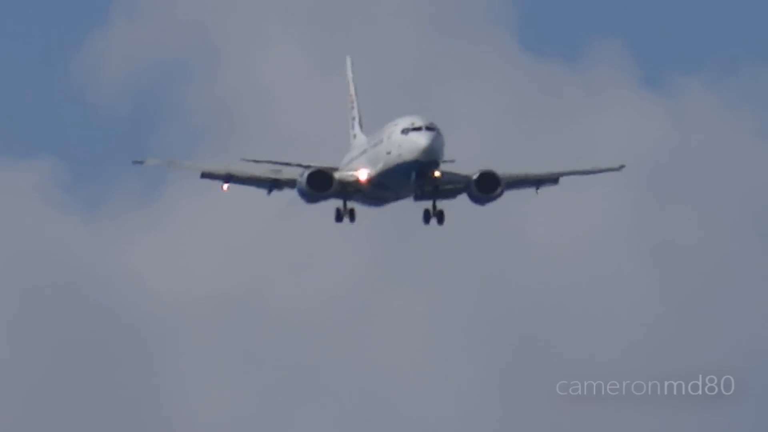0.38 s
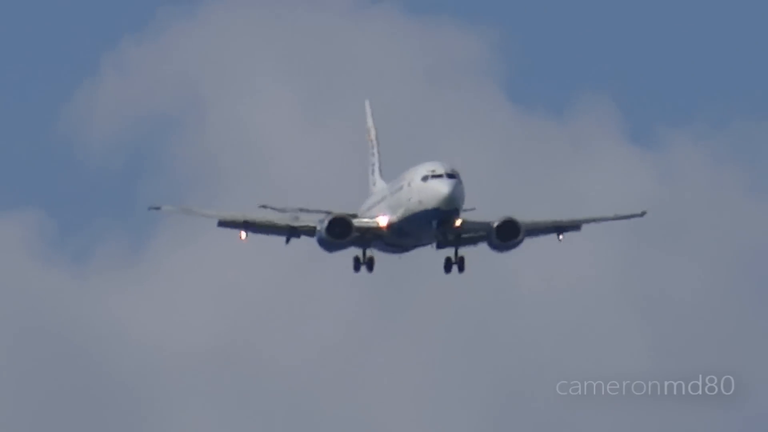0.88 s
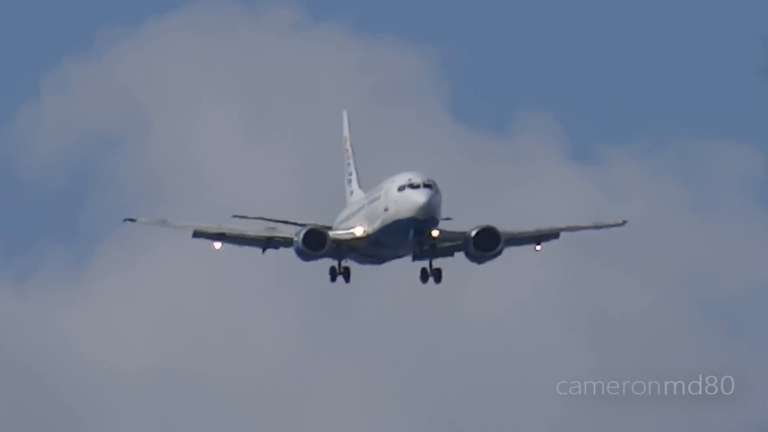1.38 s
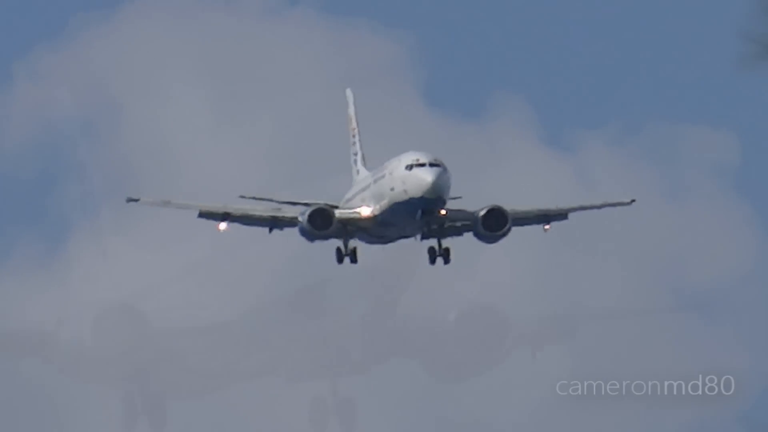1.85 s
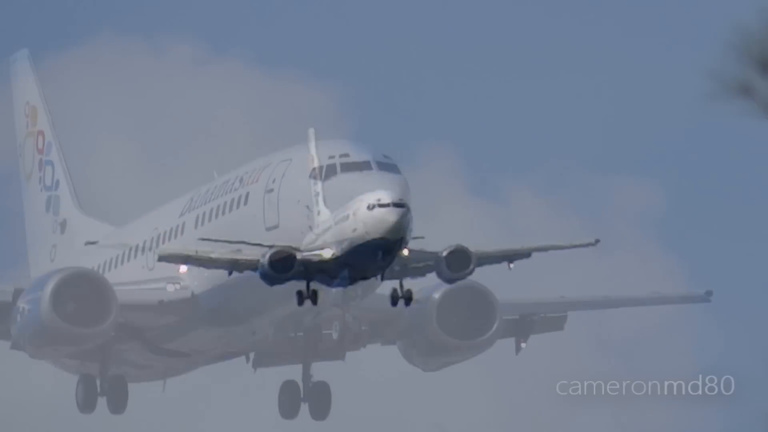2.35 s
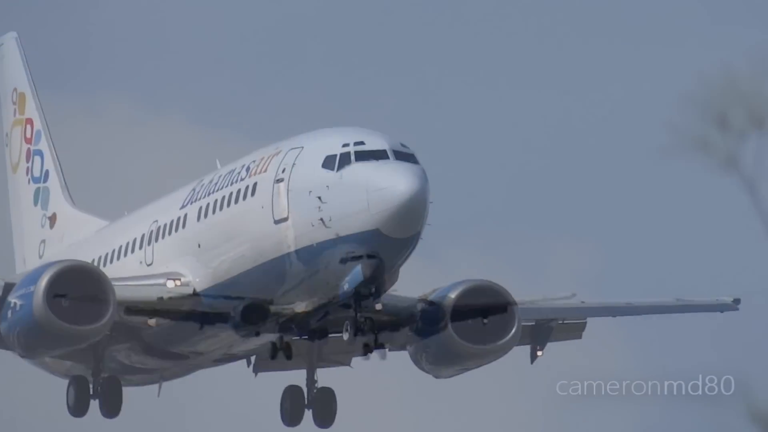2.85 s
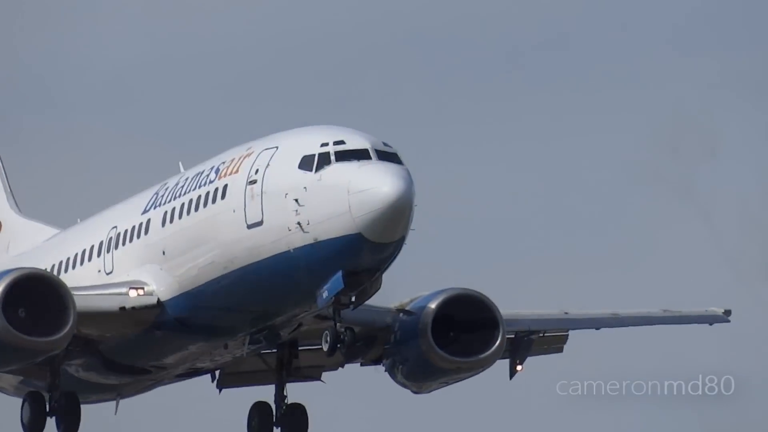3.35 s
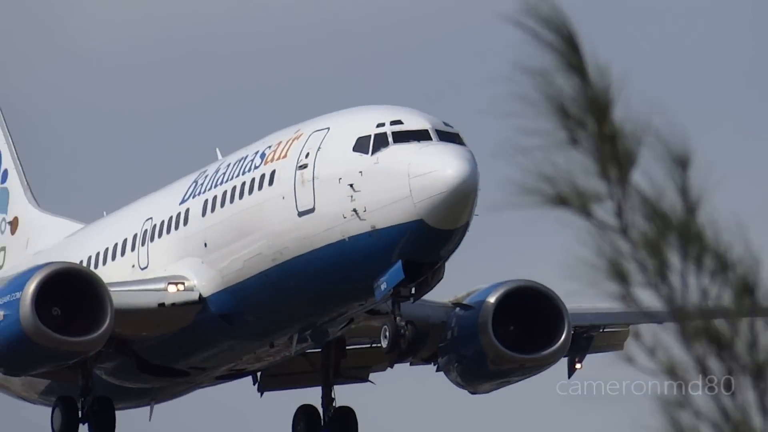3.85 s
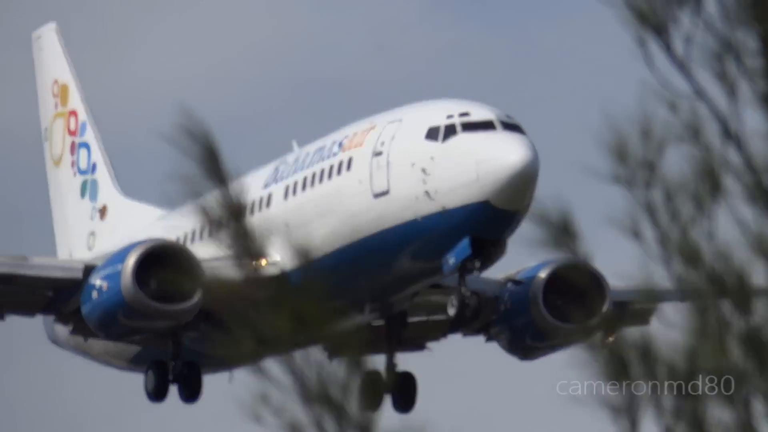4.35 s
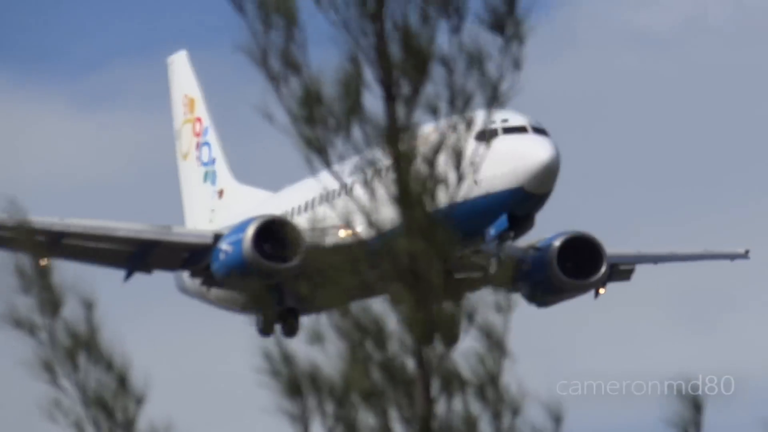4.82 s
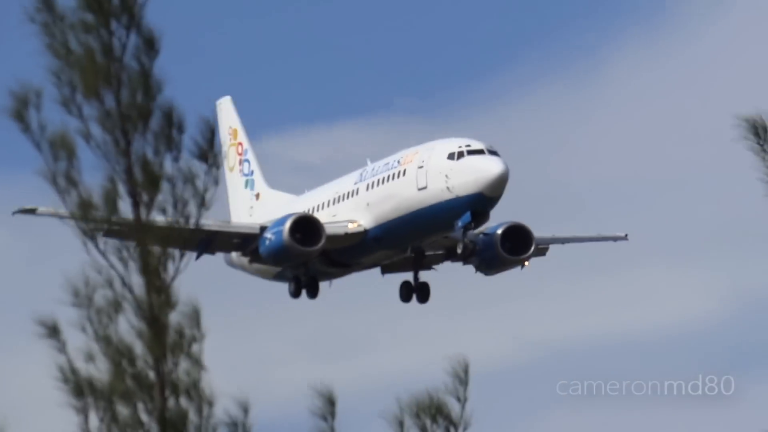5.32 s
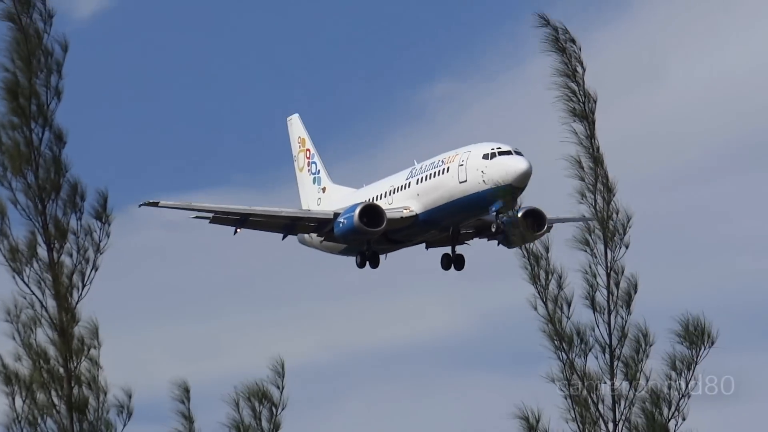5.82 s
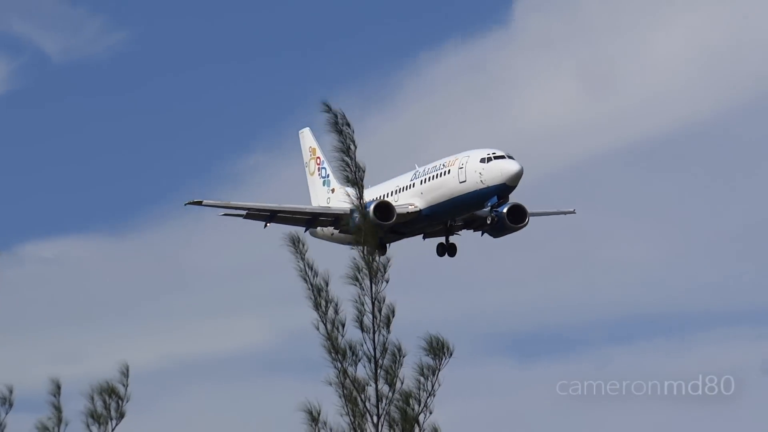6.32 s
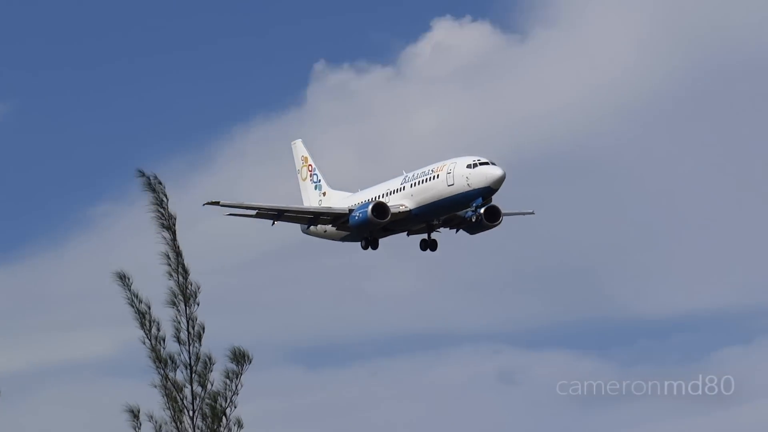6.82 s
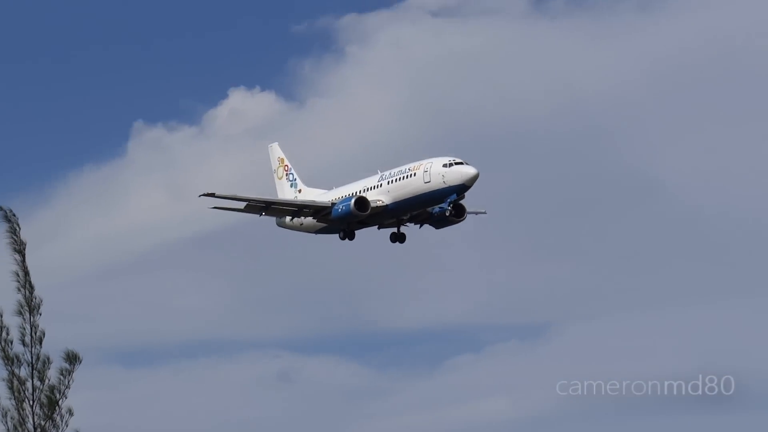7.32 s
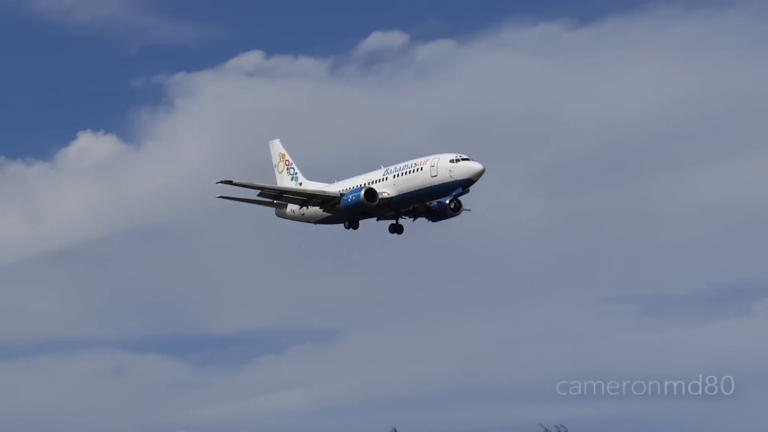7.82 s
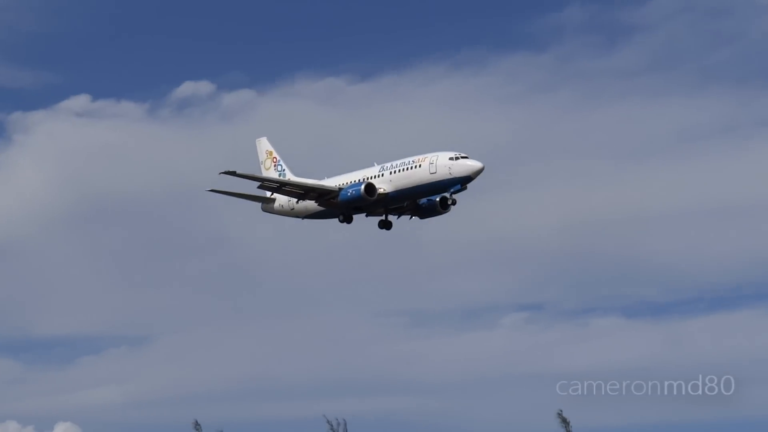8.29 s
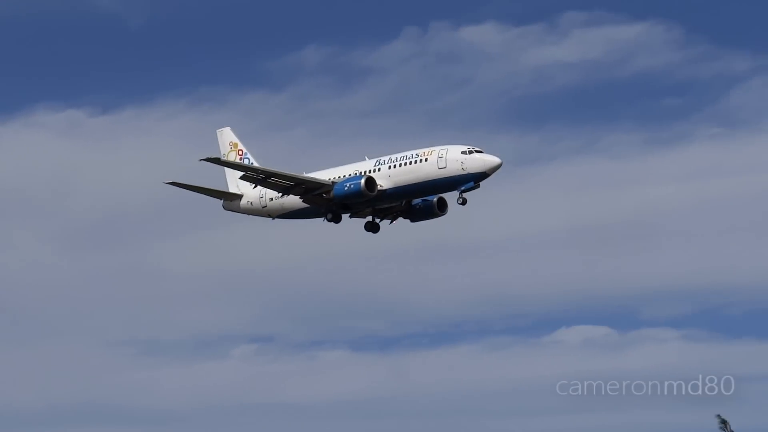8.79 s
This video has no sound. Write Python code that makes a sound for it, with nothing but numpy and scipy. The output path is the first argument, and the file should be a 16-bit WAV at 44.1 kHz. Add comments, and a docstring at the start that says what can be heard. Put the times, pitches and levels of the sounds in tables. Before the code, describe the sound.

A jet airliner closes in overhead, its shrill wavering whine and rushing roar rising over distant drone, leaf hiss and buffeting microphone wind.

```python
"""Open ground, two microphone ports: at first a distant drone, leaf hiss and wind buffeting the microphone.
From about two seconds a twin-turbofan airliner on approach takes over, heard from far below: a broad roar of
filtered noise with a dull ground echo, and fan blade, whine and core tones made of sines that turbulence flickers.
Two short high chirps come midway and breathy airframe hums later; the treble opens up as the aircraft closes in."""
import sys
import numpy as np
from scipy import signal
from scipy.io import wavfile

SR = 44100
rng = np.random.default_rng(int(sys.argv[2]) if len(sys.argv) > 2 else 0)


def to_wav(s):
    """Save 16-bit WAV."""
    ch = np.atleast_2d(s).T  # columns
    pcm = np.round(np.clip(ch, -1, 1) * 32767)  # PCM
    wavfile.write(sys.argv[1], SR, pcm.astype(np.int16))


def decibels_to_gain(level_db):
    """Convert a level in decibels to a linear amplitude gain (20 dB per decade)."""
    exponent = np.asarray(level_db, float) / 20
    return 10 ** exponent


N = 393372   # samples, about 8.9 s


def in_time(rows, fade_s=0.41):
    """Columns of a curve at every sample, and a 0-1 fade outside the span of the curve."""
    s, *columns = np.transpose(rows)
    t = np.arange(N) / SR
    inside = np.clip(1 + np.minimum(t - s[0], s[-1] - t) / fade_s, 0, 1)
    return inside, [np.interp(t, s, column) for column in columns]


def at_hz(points, hz):
    """A spectrum read on a log-frequency axis."""
    point_hz, value = np.transpose(points)
    return np.interp(np.log(hz), np.log(point_hz), value)


def band_db(spectrum, low, high):
    """Level that a spectrum puts between two frequencies."""
    power_per_hz = decibels_to_gain(2 * at_hz(spectrum, np.arange(low, high)))
    return 10 * np.log10(np.sum(power_per_hz))


def bells(rows):
    """Sum of bell-shaped rises in dB, each given by its time, height and width at half height."""
    ms = np.arange(0, N + 40, 40) / SR * 1000   # one point every 40 samples
    rises = np.zeros(len(ms))
    for s, db, width_ms in rows:
        rises += db * .5 ** ((2 * (ms - 1000 * s) / width_ms) ** 2)
    return np.interp(np.arange(N) / 40, np.arange(len(ms)), rises)


def drift(rate):
    """Slow chance of spread 1: noise through a double one-pole low-pass with its poles at rate, in Hz."""
    r = np.exp(-80 * np.pi * rate / SR)   # one point every 40 samples
    white = rng.standard_normal(N // 40 + 2002)
    slow = signal.lfilter([1], [1, -2 * r, r * r], white)[2000:]   # past the settling
    return np.interp(np.arange(N) / 40, np.arange(len(slow)), slow / slow.std())


# band edges from 36 Hz up, a quarter octave apart
BAND_EDGES_HZ = 36 * 2 ** np.arange(0, 8.4, 1 / 4)


def noise_bank(density_db, likeness, top=len(BAND_EDGES_HZ), stop=N):
    """Quarter-octave bands of stereo noise; density_db(hz) is the level per Hz over time."""
    out = np.zeros((2, N))
    white = rng.standard_normal((2, 2, stop)) * np.sqrt(SR / 2)   # 0 dB per Hz
    for k, (low, high) in enumerate(zip(BAND_EDGES_HZ[:top], BAND_EDGES_HZ[1:top])):
        band = signal.butter(2, [low, high], "band", fs=SR, output="sos")
        mid, side = signal.sosfilt(band, white[k % 2])   # neighbours use separate noise
        hz = np.sqrt(low * high)
        alike = np.clip(likeness(hz), 0, 1)
        apart = np.sqrt((1 - alike) / (1 + alike))
        out[:, :stop] += decibels_to_gain(density_db(hz)[:stop]) * (mid + apart * side * [[1], [-1]])
    return out


# how alike the two ports hear the distance: pitch_hz, likeness (0-1)
PORT_LIKENESS = [(60, 0.71), (250, 0.99), (1100, 0.92), (2400, 0.93), (5000, 0.79), (10000, 0.87)]


def port_likeness(hz):
    """Left-right likeness of distant noise at a pitch."""
    return at_hz(PORT_LIKENESS, hz)


# far surroundings, ahead of the aircraft: start_s, drone level_db (600-1300 Hz), leaf level_db (4.5-9 kHz)
SURROUNDINGS = [(0.0, -35, -57.5), (0.2, -32, -53.5), (0.8, -34, -53), (1.3, -35.5, -53.5),
                (1.75, -37.5, -53), (2.2, -38, -59), (2.6, -42, -53)]
# colour of the far drone: pitch_hz, relative level_db per Hz
DRONE_COLOUR = [(24, -62), (40, -23), (112, -8), (213, -10), (249, -18.5), (414, -6), (588, -9.5), (885, 2),
                (1140, -7.5), (1230, -8), (1440, -9), (2480, -16.5), (3520, -30), (4200, -26), (5460, -60),
                (9240, -120)]
# colour of the leaf hiss: pitch_hz, relative level_db per Hz
LEAF_COLOUR = [(2240, -42), (3800, -14.5), (4370, -10), (4790, -1.5), (6200, 0.5), (7550, -2.5),
               (10800, -6.5), (14000, -41), (22000, -120)]
# the leaves rustle up: centre_s, rise_db, width_ms
RUSTLES = [(0.18, 2.5, 240), (0.36, 3.5, 60), (0.52, 4.5, 100), (0.72, 4.5, 270), (0.95, 4.5, 60),
           (1.04, 3, 60), (1.22, 4, 170), (1.4, 3.5, 80), (1.57, 4, 70)]


def surroundings():
    """A far drone and leaf hiss: two coloured noises added in power, dying away as the aircraft takes over."""
    inside, (drone_db, leaves_db) = in_time(SURROUNDINGS, fade_s=1.0)
    drone_db = drone_db - band_db(DRONE_COLOUR, low=600, high=1300) + 1.2 * drift(8.0)
    leaves_db = leaves_db - band_db(LEAF_COLOUR, low=4500, high=9000)
    leaves_db = leaves_db + bells(RUSTLES) + .8 * drift(12.0)

    def density_db(hz):
        drone_power = decibels_to_gain(2 * (at_hz(DRONE_COLOUR, hz) + drone_db))
        leaf_power = decibels_to_gain(2 * (at_hz(LEAF_COLOUR, hz) + leaves_db))
        return 10 * np.log10(drone_power + leaf_power)
    return inside * noise_bank(density_db, lambda hz: port_likeness(hz) - .03, stop=4 * SR)


# wind at the microphone: start_s, left-right difference level_db (90-300 Hz),
# deep push level_db on both ports (100-260 Hz, before the 3.5 dB cut in wind)
BREEZE = [(0, -60, -45), (0.7, -54.5, -52), (1.3, -52, -50), (2.1, -49.5, -40.5), (2.22, -42.5, -35.5),
          (2.7, -38, -31.5), (3.1, -36, -38.5), (3.7, -41, -34.5), (4.5, -40.5, -40.5), (5.4, -42, -40.5),
          (5.9, -47, -40.5), (6.7, -53, -40.5), (7.3, -54, -42), (7.7, -47.5, -43), (8.1, -41, -45),
          (8.92, -43.5, -39)]
# single gusts on top: centre_s, rise_db, width_ms
GUSTS = [(0.14, 10, 63), (0.38, 11, 150), (0.67, 5, 60), (1.47, 5, 310), (1.74, 11, 125), (2.03, 6.5, 52),
         (2.28, 7, 310), (2.43, 3, 31), (2.63, 3, 120), (2.8, 0, 50), (3.02, 3, 130), (3.28, 2, 42),
         (4.0, 2, 64), (4.34, 2.5, 90), (4.59, 0, 83), (5.52, 5.5, 52), (6.52, 5, 71), (7.48, 6, 100),
         (8.27, 7, 67), (8.55, 3.5, 91)]
# colour of the buffeting: pitch_hz, relative level_db per Hz
BUFFET_COLOUR = [(24, -64), (40, -24), (162, -2), (250, 0), (406, -4), (2030, -18), (2210, -12),
                 (2500, -23), (3250, -53), (5500, -120)]
# colour of the deep push: pitch_hz, relative level_db per Hz
PUSH_COLOUR = [(40, -20), (70, -10), (130, -6.5), (200, -0.5), (280, -8), (420, -13.5), (700, -40)]


def wind(lumpy_db=2.5, own_db=1.5, push_lumpy_db=1.5, alike=0.14):
    """Lumpy buffeting, largely its own at each port, over deep gusts that push both ports together."""
    inside, (side_db, push_db) = in_time(BREEZE)
    gusts_db, lumps = bells(GUSTS), lumpy_db * drift(24.0)
    mid_over_side_db = 10 * np.log10((1 + alike) / (1 - alike))
    mid_db = side_db + gusts_db + mid_over_side_db - band_db(BUFFET_COLOUR, low=90, high=300)

    def buffet_db(hz):
        return at_hz(BUFFET_COLOUR, hz) + mid_db + lumps + own_db * drift(8.0)
    buffet = noise_bank(buffet_db, lambda hz: alike, top=24)
    push_db = push_db + gusts_db - band_db(PUSH_COLOUR, low=100, high=260)
    push_db = push_db + .5 * lumps + push_lumpy_db * drift(16.0)
    push = noise_bank(lambda hz: at_hz(PUSH_COLOUR, hz) + push_db, lambda hz: .93, top=18)
    return buffet + decibels_to_gain(-3.5) * push


# short high chirps, perhaps a small bird: start_s, peak level_db, starting pitch_hz
CHIRPS = [(4.4099, -36, 7500), (4.8958, -38, 7100)]


def chirps():
    """Brief sines that slide down a little under a smooth swell, alike at both ports."""
    out = np.zeros(N)
    t = np.arange(int(0.035 * SR)) / SR   # each lasts 35 ms
    for s, peak_db, hz in CHIRPS:
        at = int(s * SR)
        sliding = np.sin(2 * np.pi * hz * (t - 0.51 * t ** 2))
        out[at:at + len(t)] += decibels_to_gain(peak_db) * np.hanning(len(t)) * sliding
    return out


# lean of the tones between the ports: pitch_hz, left over right level_db
LEAN = [(60, -4), (220, -3.5), (790, 0), (2860, 0), (10400, 1.5)]


def tone(hz, level_db, scatter, rate, wide=0.069):
    """A sine carried through turbulent air: scattered paths add a part of random height and phase."""
    spin = np.exp(2j * np.pi * np.cumsum(hz) / SR)
    scattered = scatter * (drift(rate) + 1j * drift(rate))
    paths = (1 + scattered) / np.sqrt(1 + 2 * scatter ** 2)
    side = wide * (drift(2.7) + 1j * (1 + drift(3.0)))   # the two ports hear it slightly out of step
    ports = 1 + side * [[1], [-1]]
    lean = decibels_to_gain(at_hz(LEAN, hz.mean()) / 2 * np.array([[1], [-1]]))
    return np.sqrt(2) * decibels_to_gain(level_db) * lean * np.real(spin * paths * ports)


# upper breathy hum from the airframe: start_s, pitch_hz, level_db
HUM_HIGH = [(6.1, 359.8, -40.5), (6.5, 359.4, -35.5), (7.0, 353.2, -33.5), (7.4, 352.7, -38.5),
            (7.7, 352.3, -35.5), (8.0, 351.5, -36)]
# lower breathy hum from the airframe: start_s, pitch_hz, level_db
HUM_LOW = [(6.2, 196.3, -48.5), (6.6, 194, -45.5), (7.2, 194.8, -45.5), (7.7, 196, -47), (8.0, 190, -54.5)]


def hums():
    """Two wavering low tones from the airframe, heard late in the approach."""
    out = 0
    for hum in HUM_HIGH, HUM_LOW:
        inside, (hz, level_db) = in_time(hum)
        out = out + inside * tone(hz, level_db, scatter=.45, rate=9)
    return out


# the approach: start_s, engine level_db (added to the roar colour), rumble lift_db, near blade tone level_db
APPROACH = [(1.6, -67.5, 12, -82), (1.9, -66, -10, -40), (2.2, -59, 25, -35.5), (2.6, -53.5, 8, -27.5),
            (3.05, -49.5, 6.5, -23.5), (3.3, -44.5, 0, -27), (3.45, -43.5, 5.5, -16.5), (3.65, -42, 3, -21),
            (4.1, -43.5, 5.5, -17.5), (4.35, -43.5, -4, -20), (4.95, -44, -8, -19.5),
            (5.4, -43, -3.5, -19.5), (5.8, -43, -8, -18), (6.3, -41.5, 1.5, -15.5), (6.55, -41.5, 0.5, -22),
            (6.9, -42, 3.5, -15), (7.35, -43.5, 7.5, -16.5), (7.6, -43, 12.5, -23),
            (7.85, -42.5, -3.5, -14.5), (8.1, -41.5, 4.5, -21), (8.55, -42, 4, -24.5),
            (8.92, -42, 8.5, -19.5)]
RUMBLE_HZ = 417   # the lift fades out above this
NEAREST_M, CLOSING_M_PER_S = 164, 71.7   # distance at the end, and speed towards it
USUAL_M = 336   # the roar colour holds at this distance
AIR_DB_PER_100_M, AIR_POWER = 9.0, 3.58   # loss at 9 kHz, and how steeply it grows with pitch


def arrival_db(hz):
    """Engine level at a pitch: the air takes less treble as the aircraft closes in."""
    _, (level_db, rumble_db, _) = in_time(APPROACH)
    metres = NEAREST_M + CLOSING_M_PER_S * (N - np.arange(N)) / SR
    air_db = AIR_DB_PER_100_M * (metres - USUAL_M) / 100 * (hz / 9000) ** AIR_POWER
    return level_db + rumble_db / (1 + (hz / RUMBLE_HZ) ** 4) - air_db


# colour of the roar at the usual distance: pitch_hz, relative level_db per Hz
ROAR_COLOUR = [(40, -44.5), (150, -44), (200, -37), (300, -15.5), (450, -12), (1000, -10.5), (1750, -13.5),
               (2200, -9.5), (2600, -14.5), (3200, -17.5), (3600, -24.5), (5200, -27), (6400, -19),
               (7400, -31), (9000, -31.5), (11000, -53.5)]
# the roar swells for a moment in one region: centre_s, rise_db, width_ms, pitch_hz
SWELLS = [(2.29, 5.5, 120, 380), (2.88, 5.5, 80, 8650), (3.15, 5, 120, 2900), (3.55, 3.5, 230, 3930),
          (3.95, 5, 430, 800), (4.13, 5.5, 100, 2450), (5.62, 3, 260, 7000), (5.8, 7, 230, 2900),
          (7.2, 2, 290, 3350), (7.6, 4, 220, 2910), (6.1, 3, 81, 800), (6.5, 2, 130, 7200),
          (6.6, 4.5, 130, 2900), (7.15, 3.5, 92, 800), (4.9, 1, 1100, 900), (2.8, 4.5, 390, 300),
          (7.68, 4.5, 300, 6950), (7.94, 4, 74, 4480), (8.47, 4.5, 51, 5000), (8.62, 3, 120, 7000),
          (8.82, 2, 30, 6100)]
SWELL_OCTAVES = 0.75   # a swell is down to half its dB this far from its pitch


def engine_roar(flicker_db=0.8, patchy_db=1.4):
    """Broad noise; nearer air passes more treble, and turbulence flickers the treble most."""
    inside, _ = in_time(APPROACH, fade_s=0.93)
    together = drift(25.5)

    def density_db(hz):
        swells = []
        for s, db, width_ms, centre_hz in SWELLS:
            octaves = np.log2(hz / centre_hz)
            swells.append((s, db * .5 ** ((octaves / SWELL_OCTAVES) ** 2), width_ms))
        flicker = flicker_db * (hz / 5000) ** 0.47 * together + patchy_db * drift(6.8)
        return at_hz(ROAR_COLOUR, hz) + arrival_db(hz) + bells(swells) + flicker
    return inside * noise_bank(density_db, port_likeness) * decibels_to_gain([[.6], [-.6]])   # a slight lean to the left


# ground echo, lagging more as the aircraft comes higher overhead: start_s, lag_ms, strength (0-1)
GROUND_ECHO = [(0, 1.2, .2), (5.0, 1.4, .22), (6.1, 2.05, .42), (6.9, 2.5, .4), (7.5, 2.7, .4),
               (8.1, 3.05, .42), (8.92, 3.45, .45)]


def ground(x):
    """Direct sound plus a dull echo off the ground; the power below the cut is kept."""
    _, (lag_ms, strength) = in_time(GROUND_ECHO)
    dull = signal.sosfilt(signal.butter(2, 1200, fs=SR, output="sos"), x)   # cut in Hz
    late = np.arange(N) - lag_ms * SR / 1000
    echo = np.array([np.interp(late, np.arange(N), port) for port in dull])
    given_up = 1 - np.sqrt(np.clip(1 - strength ** 2, 0, 1))
    return x + strength * echo - given_up * dull


# one tone flares up, or dips where negative: centre_s, rise_db, width_ms, pitch_hz
FLARES = [(2.3, -8, 150, 2246), (3.62, 12.5, 160, 1588), (4.34, 14.5, 120, 1584), (4.6, 7.5, 260, 6234),
          (4.82, 12.5, 110, 1577), (5.06, 6, 88, 1575), (5.22, 6.5, 240, 1577), (5.25, 4.5, 200, 6376),
          (5.42, 13, 89, 1576), (5.62, 14, 230, 6371), (5.66, 9, 80, 6848), (5.9, 12.5, 120, 1574),
          (6.0, 9.5, 130, 6635), (6.65, 5.5, 250, 2260), (6.84, 11, 180, 1571), (7.46, 14.5, 52, 1563),
          (7.8, 11.5, 200, 1554), (8.1, 10.5, 120, 1543), (8.4, 19, 260, 1539), (8.72, 10, 190, 1527),
          (8.58, 13, 180, 7720), (8.58, 8, 260, 6470), (8.2, 9.5, 170, 6515), (8.57, 11, 93, 8165),
          (8.82, 11.5, 70, 7692), (8.82, 12, 70, 8142), (7.05, 6.5, 210, 6170), (7.55, 10.5, 160, 6107),
          (8.45, 3, 260, 6030)]
FLARE_HZ = 25   # how near a 2 kHz tone must be, in proportion at other pitches


def weak_tone(hz, over_db, scatter, rate, wander_db=2.2):
    """A tone riding on the engine level, wandering slowly, with the flares that fall on it."""
    mine = []
    for s, db, width_ms, flare_hz in FLARES:
        now_hz = hz[int(s * SR)]
        if abs(now_hz - flare_hz) < FLARE_HZ * now_hz / 2000:
            mine.append((s, db, width_ms))
    level_db = arrival_db(hz.mean()) + over_db + bells(mine) + wander_db * drift(2.1)
    return tone(hz, level_db, scatter, rate)


# pitches of the core tones: multiples of the main core tone
CORE_ORDERS = [1, .925, 1.075, 1.283, 1.358]
# the two highest come up most as the engines turn side-on: rise_db_per_s of each core tone, full at the end
CORE_TURN = [0, 2, 0, 5, 2.5]


def octave_and_core_tones(fan_hz, core_hz, core_levels_db):
    """The octave of one fan's blade tone and the cluster of core tones of the same engine."""
    out = weak_tone(2 * fan_hz, over_db=-4, scatter=.4, rate=22)
    to_go_s = (N - np.arange(N)) / SR
    for order, end_db, turn in zip(CORE_ORDERS, core_levels_db, CORE_TURN):
        out += weak_tone(order * core_hz, end_db - turn * to_go_s, scatter=.6, rate=20)
    return out


# far engine, its pitch climbing and then sinking: start_s, fan blade pitch_hz, main core pitch_hz
FAR_ENGINE = [(1.7, 2190, 6060), (2.0, 2210, 6110), (2.4, 2250, 6205), (2.6, 2265, 6278), (3.0, 2278, 6354),
              (3.6, 2290, 6406), (4.2, 2290, 6402), (4.8, 2282, 6372), (5.2, 2284, 6376), (5.7, 2279, 6366),
              (6.3, 2272, 6340), (6.6, 2260, 6308), (7.0, 2256, 6293), (7.4, 2244, 6278), (7.6, 2238, 6254)]
# far core tones at the end: level_db of each over the engine level
FAR_CORE = [5, 0, -7, -4, -8]


def far_engine_tones():
    """Fan blade tone, its octave and the core tones of the far engine."""
    inside, (fan_hz, core_hz) = in_time(FAR_ENGINE)
    fan = weak_tone(fan_hz, over_db=10, scatter=.26, rate=16)
    return inside * (fan + octave_and_core_tones(fan_hz, core_hz, FAR_CORE))


# near engine: start_s, fan blade pitch_hz, low whine pitch_hz, main core pitch_hz
NEAR_ENGINE = [(1.8, 2232, 1587, 6165), (2.2, 2236, 1586, 6178), (2.7, 2235, 1590, 6214),
               (3.3, 2232, 1590, 6221), (3.45, 2237, 1589, 6216), (3.8, 2221, 1582, 6212),
               (4.2, 2225, 1583, 6216), (4.5, 2229, 1586, 6237), (4.8, 2223, 1577, 6203),
               (5.1, 2208, 1575, 6168), (5.5, 2213, 1575, 6168), (5.8, 2219, 1575, 6182),
               (6.2, 2211, 1576, 6165), (6.5, 2218, 1575, 6202), (6.85, 2207, 1571, 6175),
               (7.1, 2209, 1570, 6170), (7.5, 2193, 1562, 6109), (7.9, 2185, 1550, 6083),
               (8.25, 2169, 1541, 6059), (8.55, 2154, 1536, 6015), (8.92, 2122, 1519, 5990)]
# near core tones at the end: level_db of each over the engine level
NEAR_CORE = [2, -2, -1, -4, -14]
# brief dropouts of the near blade tone as scattered paths cancel: centre_s, depth_db, width_ms
DROPOUTS = [(2.01, 16, 60), (2.47, 9, 30), (2.562, 12, 24), (2.792, 15, 36), (3.027, 19, 61),
            (3.287, 9, 27), (3.499, 16, 17), (3.711, 14, 15), (3.815, 9, 36), (4.21, 14, 34),
            (4.46, 12, 17), (4.626, 13, 19), (4.755, 10, 31), (5.012, 11, 41), (5.343, 10, 24),
            (5.428, 14, 25), (5.522, 15, 26), (5.732, 10, 24), (6.075, 13, 42), (6.425, 13, 11),
            (6.486, 9, 50), (6.56, 15, 14), (6.759, 12, 21), (7.54, 9, 12), (7.697, 11, 16),
            (7.993, 15, 19), (8.045, 9, 28), (8.219, 12, 23), (8.814, 11, 13)]


def near_engine_tones():
    """Fan blade tone with dropouts, its octave, the low whine and the core tones of the near engine."""
    inside, (fan_hz, whine_hz, core_hz) = in_time(NEAR_ENGINE)
    _, (_, _, fan_db) = in_time(APPROACH)
    fan = tone(fan_hz, fan_db - bells(DROPOUTS), scatter=.33, rate=16)
    whine = weak_tone(whine_hz, over_db=3, scatter=.15, rate=12, wander_db=1.0)
    return inside * (fan + whine + octave_and_core_tones(fan_hz, core_hz, NEAR_CORE))


def scene():
    """Surroundings, wind and chirps, then the aircraft; only its roar gets the ground echo."""
    around = surroundings() + wind() + chirps()
    aircraft = ground(engine_roar()) + hums() + far_engine_tones() + near_engine_tones()
    return around + aircraft


def roll_off(x):
    """The treble ends steeply here."""
    return signal.sosfilt(signal.butter(12, 10950, fs=SR, output="sos"), x)


def record(dry):
    """The microphone rolls off the top above 8.7 kHz and rounds the peaks towards full scale."""
    rolled = signal.sosfilt(signal.butter(4, 8700, fs=SR, output="sos"), dry)
    mix = np.tanh(rolled)
    return roll_off(mix)


dry = scene()
out = record(dry)
to_wav(out)
```